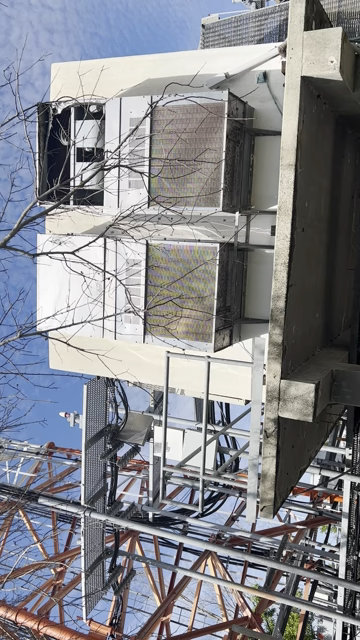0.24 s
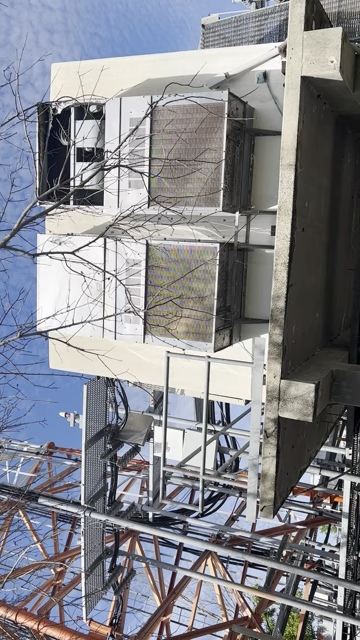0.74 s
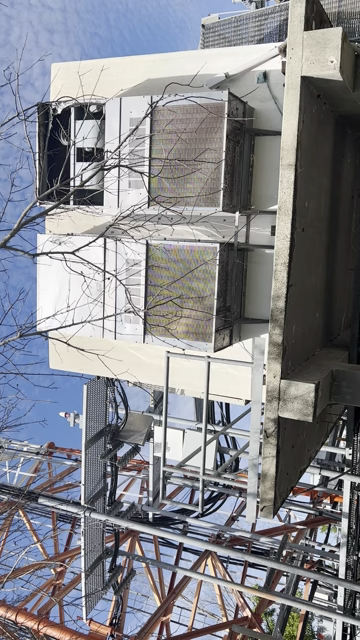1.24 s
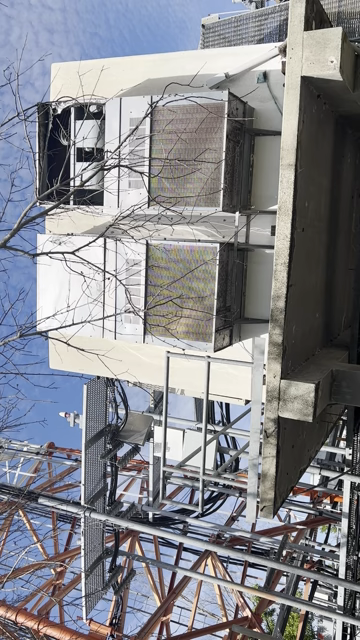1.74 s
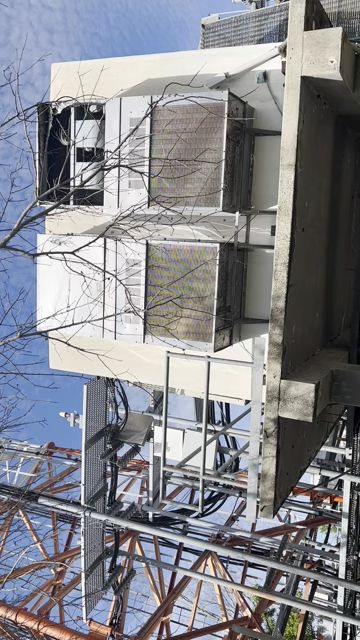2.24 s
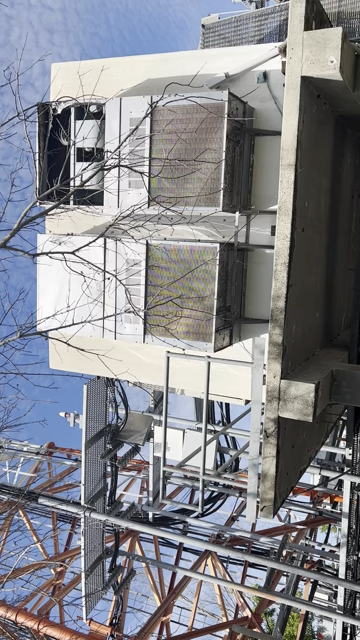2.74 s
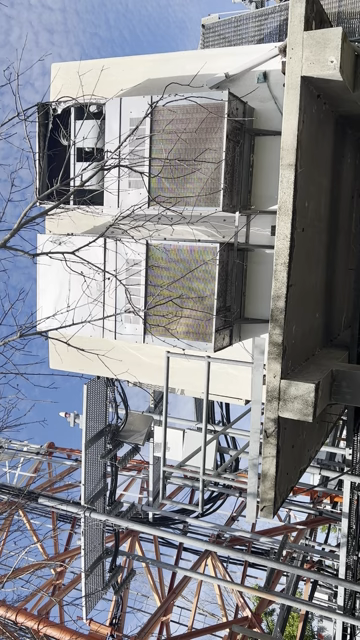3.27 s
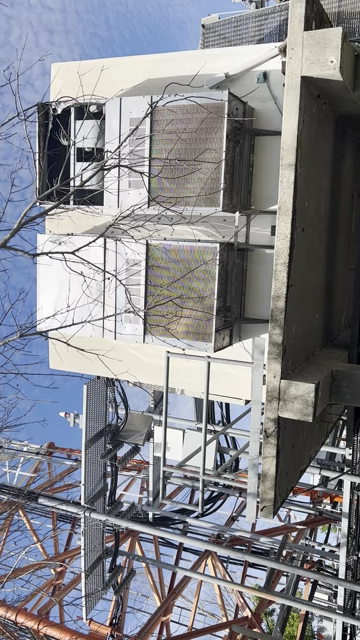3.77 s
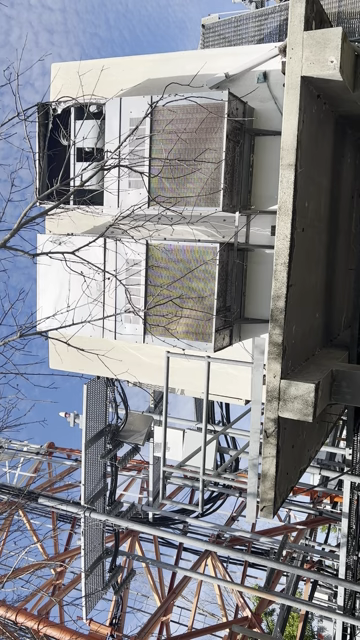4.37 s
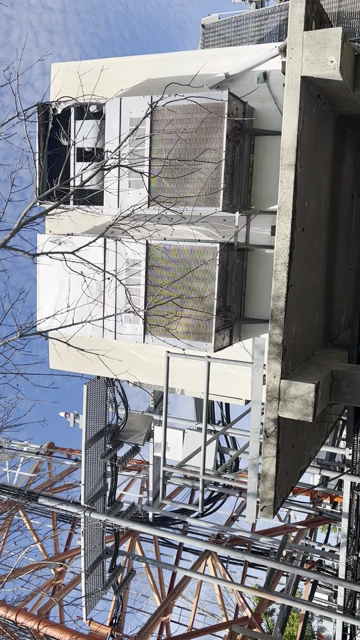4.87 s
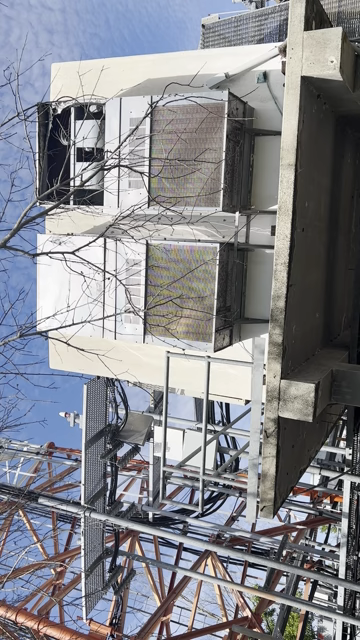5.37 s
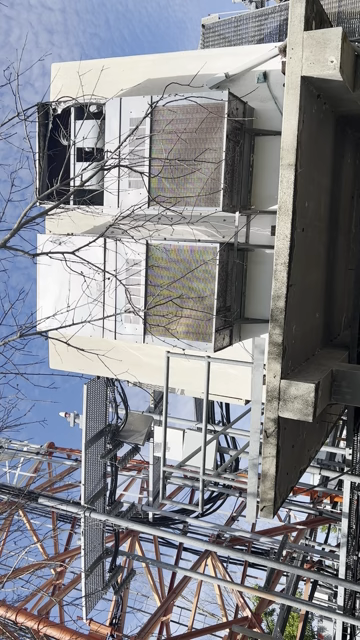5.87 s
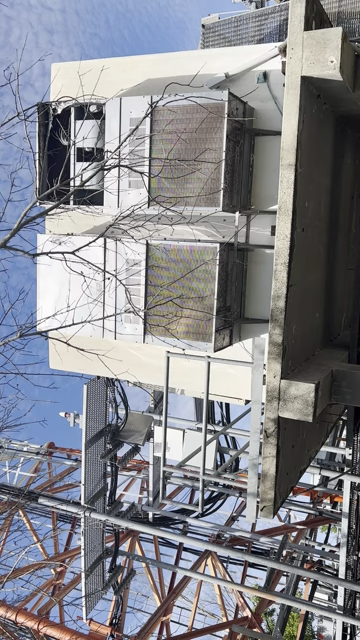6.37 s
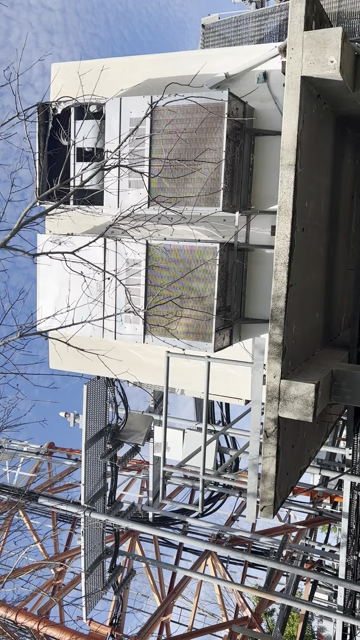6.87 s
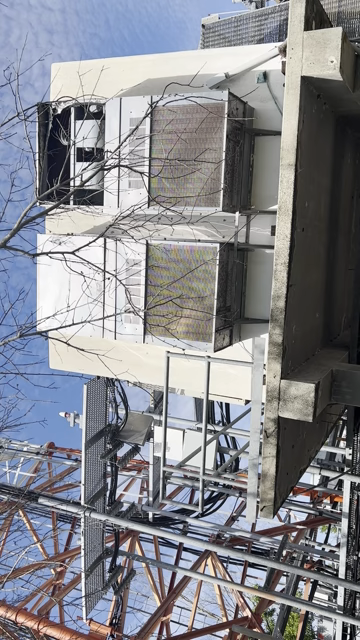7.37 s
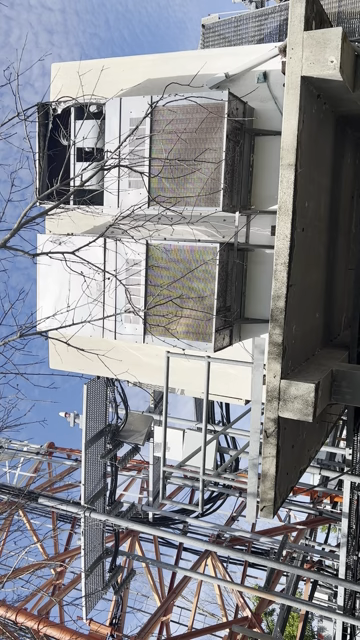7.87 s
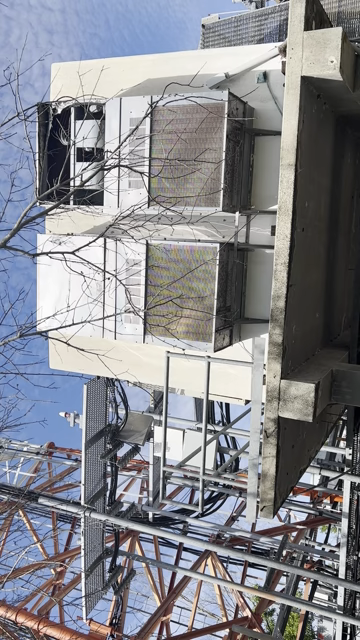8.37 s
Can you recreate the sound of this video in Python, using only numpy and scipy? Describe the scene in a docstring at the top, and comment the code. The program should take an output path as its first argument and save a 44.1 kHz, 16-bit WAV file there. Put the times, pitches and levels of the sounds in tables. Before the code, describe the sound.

Low, wavering fan drone and compressor hum from wall-mounted cooling units outdoors, with muffled airflow, tiny clicks, faint squeaks and a soft knock near the end.

```python
"""Two wall-mounted air conditioning units

Two units run on the wall of an equipment hut, heard outdoors from a few metres away.
One fan drones at its blade rate, a sine that swells and fades; the second fan and the compressors
add low lines, some of which beat. Air rushing through the coils is shaped noise; the panels whine
faintly as narrow resonances. Light ticks, dull knocks and a scuff are decaying bursts of noise; a tap
on metal is a few ringing modes; faint squeals and a thin high chirp are short tones with reflections."""
import sys
import numpy as np
from scipy import signal
from scipy.fft import rfft, irfft
from scipy.io import wavfile

SR = 44100
rng = np.random.default_rng(int(sys.argv[2]) if len(sys.argv) > 2 else 0)


def wav_out(sig):
    """Save sig, one row per channel (or a flat mono array), as 16-bit PCM at SR to the path in sys.argv[1]."""
    wavfile.write(sys.argv[1], SR, np.round(np.clip(np.atleast_2d(sig).T, -1, 1) * 32767).astype(np.int16))


N = 380141
TIME = np.arange(N) / SR   # s
BINS = np.fft.rfftfreq(N, 1 / SR)   # Hz

# Mean spectrum of the rushing air: f/Hz, density/dB per Hz
AIR_SPECTRUM = [(20, -92.5), (45, -71.5), (62, -61.5), (95, -62.5), (145, -63.5), (240, -71), (330, -75.5),
                (500, -77), (900, -84.5), (1600, -88.5), (2400, -97), (4700, -103), (7500, -111.3),
                (11800, -118.5), (15000, -118)]
# Likeness of the air noise at the two sides: f/Hz, likeness (0 to 1), phase lead of the left/rad
AIR_COHERENCE = [(60, .99, .05), (350, .88, .27), (700, .5, .35), (1000, .3, 0), (1250, .05, -1.6),
                 (1500, .45, -3.1), (1780, .9, -6.2), (2800, .77, -5.8), (4600, .7, -5.9),
                 (5500, .55, -6.9), (7300, .95, -6.3), (10000, .9, -9.4), (12400, .9, -12.4),
                 (13800, .95, -12.7), (15200, .8, -15.4)]
# Left-right balance of the air noise: f/Hz, level difference/dB
AIR_BALANCE = [(60, 1), (110, 3.5), (200, 1), (380, 1), (700, 3.5), (1290, 1), (2380, 2.5), (4400, 3),
               (8120, 0), (15000, 1)]
# Slow swells of the air noise: t/s, rumble level/dB, rush level/dB, hiss level/dB
AIR_SWELLS = [(0, 2, -0.6, 0), (.9, -1.5, -0.3, -0.1), (1.8, -3.5, -.7, -0.6), (2.2, -0.5, -.5, 0),
              (3.3, -2, -0.6, -0.5), (3.85, 3, 1.5, -0.2), (4.45, -2.5, -1.5, -0.5), (5.1, -2, -0.2, -0.3),
              (5.7, 2, 1, -0.5), (6.5, -1, 0.5, 0), (7.3, -1.5, 1.5, 0.5), (7.75, 1, 0, 0),
              (8.05, 3, 0.7, 0.9), (8.62, -0.5, 1, 0.7)]
# Unevenness of the air drawn into the units: t/s, level/dB
INFLOW = [(0, -0.5), (.9, -2), (1.7, -6), (2.7, -3.5), (3.3, -8), (3.9, 3), (4.55, -2), (5.1, .5),
          (6.2, 1.5), (7.0, 0.5), (8.62, 0.5)]
# Casing resonances stirred by the air, and motor whines:
# f/Hz, width/Hz, level/dB, left-right difference/dB, share of the inflow's swing
CASING_MODES = [(57.3, 7.6, -53.5, 0, 0), (205.1, 11.2, -54.5, 6.5, .8), (283, 16, -61, 2, .8),
                (389, 28, -60, 2.5, 0), (469.5, 18, -60, 1.5, .2), (553.7, 12, -63.5, 2, .3),
                (588.3, 14, -64.5, 1, 0.057), (638, 12, -65, 4, 0.26), (779, 9, -64.5, 2, 0.1),
                (871, 70, -65.5, 5, .1), (1022, 13, -69.5, 1.5, 0.39), (1127, 16, -75.5, 8.5, 0),
                (2740, 9.1, -83, -2.5, 0), (4470, 6.5, -86, -1.5, 0), (6440, 3.6, -100, 2.5, 0),
                (8550, 4.4, -99, -8, 0.014)]

# Light ticks: t/s, level/dB, centre f/Hz, t60/s
TICKS = [(.442, -57.5, 12000, .025), (.812, -55.5, 12000, 0.035), (.851, -66, 7500, 0.049),
         (1.178, -69, 8500, .2), (1.81, -69, 10500, 0.12), (2.27, -72, 12000, .17), (8.0, -75, 12500, .15)]
TICK_WIDTH_HZ, TICK_ATTACK_S = 15000, 0.0016
# Duller wash from the walls after each tick, its level relative to the tick
TICK_ECHO_DB, TICK_ECHO_HZ, TICK_ECHO_RISE_S, TICK_ECHO_T60_S = -11.5, 7000, 0.012, 0.22
# Small dull knocks, the last one leading into the scuff: t/s, level/dB, centre f/Hz, t60/s
KNOCKS = [(1.191, -42, 1030, .04), (8.436, -39, 680, .04)]
KNOCK_Q, KNOCK_ATTACK_S = 3.2, 0.003   # Q is centre over width
# A light tap on metal and its bounce: t/s, strength/dB
CLINKS = [(1.566, 2), (1.572, -2.5)]
# Metal modes that the tap sets ringing, at strength 0 dB: f/Hz, level/dB, t60/s
CLINK_MODES = [(2550, -62, .04), (3580, -61, .04), (4020, -66, .04), (4330, -65, .04)]
# Resonances of the scuffed body: centre f/Hz, width/Hz, level/dB, t60/s
SCUFF_BODY = [(533, 380, -48, .12), (1100, 600, -51.5, 0.14), (1750, 800, -52, .15),
              (2350, 270, -55.5, .17), (2750, 450, -58, .17), (4380, 2200, -65, 0.45),
              (6950, 2500, -72, 0.48)]
SCUFF_S, SCUFF_ATTACK_S, SCUFF_HOLD_S = 8.441, 0.013, 0.019
# Faint metallic squeals, levels before swell and mix:
# t/s, level/dB, f/Hz, length/s, waver as a share of f
SQUEALS = [(5.2, -71, 2643, .225, .004), (5.322, -66, 2185, .05, .006), (7.585, -66, 1620, .11, .01),
           (7.715, -70, 1580, .13, .01), (7.73, -71, 1820, .11, .012), (7.915, -64, 1570, 0.094, .007),
           (7.915, -68, 1835, .094, .008), (8.02, -67, 1590, .09, .01)]
SQUEAL_EDGE_S, SQUEAL_WAVER_PER_S = 0.019, 29.5
# Two quick pips of one thin chirp: t/s, level/dB
PIPS = [(5.781, -61), (5.792, -53.5)]
PIP_HZ, PIP_SAG_HZ_PER_S = 12920, 25000   # starting pitch and rate of fall
PIP_ATTACK_S, PIP_LENGTH_S = 0.003, 0.02

# Compressor and mains hum, and thin motor whines: f/Hz, level/dB
HUM = [(39.5, -57.5), (59.0, -51), (79.9, -53.5), (94.9, -63.5), (120.1, -45.5), (825, -78.5), (1179, -83)]
# Level of one compressor line, which beats with its neighbours: t/s, level/dB
THROB = [(0, -49), (0.9, -45.5), (1.9, -47.5), (2.6, -43), (3.7, -39.5), (4.15, -57), (8.62, -59.5)]
THROB_HZ = 61.5
# Blade tone of the second fan, before its overall gain: t/s, level/dB
SECOND_FAN = [(0.0, -46), (0.84, -58), (1.08, -41), (1.56, -58), (1.66, -41), (2.33, -43.5), (2.47, -63),
              (2.76, -38.5), (3.27, -53.5), (3.62, -39), (4.82, -52), (5.71, -38.5), (6.53, -50.5),
              (8.62, -47.5)]
# Other shaft orders of the second fan, levels at an inflow of 0 dB:
# multiple of the shaft rate, level/dB, share of the inflow's swing
SHAFT_ORDERS = [(4, -49.5, 0.074), (5, -52, 0.056), (6, -51.5, .5), (11, -58.5, 0), (12, -63, 0),
                (15, -57.5, 0.96), (17, -74, 0), (20, -69.5, 0.02)]
SHAFT_HZ, BLADE_ORDER = 14.13, 10   # mean turns per second; blade tone as a multiple of it
# Blade rate of the louder fan, which follows its speed: t/s, f/Hz
BLADE_RATE = [(0, 127.6), (0.85, 124.8), (2.4, 126.3), (4.1, 127.4), (4.9, 126), (5.5, 127), (6.2, 124.8),
              (6.7, 126.2), (8.62, 124.5)]
# Blade tone of the louder fan, swelling and fading: t/s, level/dB
DRONE = [(0.0, -37), (0.48, -37), (0.8, -43.5), (1.22, -35), (1.7, -60), (2.0, -37), (2.52, -32),
         (2.97, -41), (3.4, -39), (4.4, -36.5), (4.66, -42.5), (5.08, -32), (5.62, -30.5), (6.26, -37),
         (6.55, -32), (6.86, -36), (7.02, -51), (7.5, -42), (7.78, -45), (7.95, -36.5), (8.27, -33.5),
         (8.62, -53)]

CUTOFF_HZ = 15500


def from_db(db):
    """Amplitude ratio of a level in decibels."""
    return 10 ** (np.asarray(db) / 20)


def rms_one(x):
    """Scale to unit root mean square."""
    return x / np.sqrt(np.mean(np.abs(x) ** 2) + 1e-30)


def in_time(rows):
    """Linear interpolation of each column at every sample."""
    s, *columns = np.transpose(rows)
    return [np.interp(TIME, s, c) for c in columns]


def over_hz(rows):
    """Interpolation of each column at every frequency bin, on a logarithmic axis."""
    hz, *columns = np.transpose(rows)
    return [np.interp(np.log(BINS + 1), np.log(hz), c) for c in columns]


def drift(rate_hz):
    """Slow random wander of spread 1: noise through a double-pole low-pass."""
    step = 100   # samples between computed points
    warm_up = 1000   # points discarded while the filter settles
    pole = np.exp(-2 * np.pi * rate_hz * step / SR)
    noise = rng.standard_normal(N // step + 2 + warm_up)
    slow = signal.lfilter([1], [1, -2 * pole, pole * pole], noise)[warm_up:]
    return np.interp(np.arange(N) / step, np.arange(len(slow)), rms_one(slow))


def tone(hz):
    """A sine of unit rms whose phase is the integral of its frequency."""
    turns = np.cumsum(hz * np.ones(N)) / SR + rng.random()
    return np.sqrt(2) * np.sin(2 * np.pi * turns)


def resonate(x, hz, width):
    """A two-pole resonance: its bandwidth sets the pole radius."""
    r = np.exp(-np.pi * width / SR)
    return signal.lfilter([1, 0, -1], [1, -2 * r * np.cos(2 * np.pi * hz / SR), r * r], x)


def pan(db):
    """Left and right gains that share a level difference equally."""
    return from_db(np.array([[db], [-db]]) / 2)


def reflections(x, t60):
    """Diffuse reverberation: dense, dying echoes of unit energy from walls and steelwork."""
    age = TIME[:SR // 2]
    echoes = rng.standard_normal(len(age)) * from_db(-60 * age / t60)
    return signal.fftconvolve(x, echoes / np.linalg.norm(echoes))[:N]


def bursts(rows, hold=0, spread=0.8):
    """Friction and contact excite a resonance with noise that rises, holds and decays exponentially."""
    out = np.zeros((2, N))
    for s, level_db, hz, width, attack, t60 in rows:
        start = round(s * SR)
        age = TIME[:min(SR, N - start)]
        mid, side = rng.standard_normal((2, len(age)))
        noise = mid + spread * side * [[1], [-1]]
        ring = resonate(resonate(noise, hz, width), hz, width)
        rise = np.clip(age / attack, 0, 1)
        decay_db = -60 * np.maximum(age - attack - hold, 0) / t60
        out[:, start:start + len(age)] += rms_one(ring) * rise * from_db(level_db + decay_db)
    return out


def air(lumpy_db=2.5, lumps_hz=7, patchy_db=1.0, hiss_patchy_db=0.5):
    """Turbulence through the coils: partly coherent noise in three bands, each with its own swells."""
    likeness, lead = over_hz(AIR_COHERENCE)
    likeness = np.clip(likeness, 0, 1)
    shared, left, right = rfft(rng.standard_normal((3, N)))
    sides = np.array([[0.5], [-0.5]])
    common = np.sqrt(likeness) * shared * np.exp(1j * lead * sides)
    separate = np.sqrt(1 - likeness) * np.array([left, right])
    level_db = over_hz(AIR_SPECTRUM)[0] + over_hz(AIR_BALANCE)[0] * sides
    # sqrt(SR / 2) turns a density per Hz into the level of white noise
    noise = irfft((common + separate) * from_db(level_db) * np.sqrt(SR / 2), N)

    def lowpass(hz):
        """Zero-phase low-pass that splits the bands."""
        return signal.sosfiltfilt(signal.butter(2, hz, fs=SR, output="sos"), noise)

    below_rush, below_hiss = lowpass(160), lowpass(1350)
    bands = below_rush, below_hiss - below_rush, noise - below_hiss   # rumble, rush, hiss
    flicker = lumpy_db * drift(lumps_hz), patchy_db * drift(15), hiss_patchy_db * drift(17)
    swells = in_time(AIR_SWELLS)
    return sum(band * from_db(swell + fast) for band, swell, fast in zip(bands, swells, flicker))


def casing(spread_hz=1100, sway_db=1.0):
    """Forced resonance: turbulence feeds narrow modes, whose two sides differ more at high frequency."""
    out = 0
    mid, side = rng.standard_normal((2, N))
    inflow = in_time(INFLOW)[0]
    for hz, width, level_db, pan_db, share in CASING_MODES:
        stir = mid + min(hz / spread_hz, 0.7) * side * [[1], [-1]]
        # two wider resonances in series make one of about the listed width
        ring = resonate(resonate(stir, hz, 1.3 * width), hz, 1.3 * width)
        swell = from_db(share * inflow + sway_db * drift(0.95))
        out = out + from_db(level_db) * pan(pan_db) * rms_one(ring * swell)
    return out


def ticks():
    """Brief contacts radiate a broad, bright spectrum, with a duller wash from the walls behind."""
    direct, wash = [], []
    for s, db, hz, t60 in TICKS:
        direct.append((s, db, hz, TICK_WIDTH_HZ, TICK_ATTACK_S, t60))
        wash.append((s, db + TICK_ECHO_DB, TICK_ECHO_HZ, TICK_WIDTH_HZ, TICK_ECHO_RISE_S, TICK_ECHO_T60_S))
    return bursts(direct + wash)


def knocks():
    """A soft impact excites one damped resonance, its width set by centre frequency over Q."""
    return bursts([(s, db, hz, hz / KNOCK_Q, KNOCK_ATTACK_S, t60) for s, db, hz, t60 in KNOCKS])


def clink():
    """Modal impact: each touch sets a few metal modes ringing in exponential decay."""
    out = np.zeros(N)
    for s, strength_db in CLINKS:
        age = np.maximum(TIME - s, 0)
        for hz, db, t60 in CLINK_MODES:
            decay_db = -60 * np.minimum(age / t60, 2)   # levels off 120 dB down
            out += (age > 0) * from_db(strength_db + db + decay_db) * tone(hz)
    return out


def squeals(flutter_db=1.0, arch_db=4.0, rough=0.3, rough_hz=90, direct_db=-3.5, echo_db=-6.0, t60=0.3):
    """Modulated tones: amplitude arches and roughens, pitch wavers, and reflections blur the whole."""
    out = np.zeros(N)
    for s, level_db, hz, length, waver in SQUEALS:
        inside = np.maximum(np.minimum(TIME - s, s + length - TIME), 0)   # s to the nearer end
        edges = np.minimum(inside / SQUEAL_EDGE_S, 1)
        envelope = edges * from_db(level_db + arch_db * 2 * inside / length)
        pitch = hz * (1 + waver * drift(SQUEAL_WAVER_PER_S))
        flutter = from_db(flutter_db * drift(SQUEAL_WAVER_PER_S))
        out += envelope * flutter * (1 + rough * drift(rough_hz)) * tone(pitch)
    echoes = np.array([reflections(out, t60), reflections(out, t60)])
    return from_db(direct_db) * out + from_db(echo_db) * echoes


def chirp(t60=0.3):
    """Linear frequency sweeps: short falling sines near the top of hearing, smeared by reflections."""
    call = np.zeros(N)
    for s, level_db in PIPS:
        since = np.clip(TIME - s, 0, PIP_LENGTH_S)
        envelope = np.interp(since, [0, PIP_ATTACK_S, PIP_LENGTH_S], [0, 1, 0]) ** 2
        call += from_db(level_db) * envelope * tone(PIP_HZ - PIP_SAG_HZ_PER_S * since)
    return call + reflections(call, t60)


def scuff(grit_db=1.5, grit_hz=130):
    """Sliding friction: a short, slightly gritty rub excites all resonances of a body together."""
    rows = [(SCUFF_S, db, hz, width, SCUFF_ATTACK_S, t60) for hz, width, db, t60 in SCUFF_BODY]
    return from_db(grit_db * drift(grit_hz)) * bursts(rows, hold=SCUFF_HOLD_S)


def compressors(sway_db=2.0):
    """Beating: nearly steady lines, of which the close pair near 60 Hz throbs until one fades."""
    steady = sum(from_db(level_db + sway_db * drift(0.74)) * tone(hz) for hz, level_db in HUM)
    return steady + from_db(in_time(THROB)[0]) * tone(THROB_HZ)


def second_fan(blade_gain_db=-2.0, speed_wander=0.002, sway_db=1.9):
    """Shaft harmonics: all lines follow one wandering speed; uneven inflow sways some weaker orders."""
    shaft = SHAFT_HZ * (1 + speed_wander * drift(0.9))
    out = from_db(in_time(SECOND_FAN)[0] + blade_gain_db) * tone(BLADE_ORDER * shaft)
    inflow = in_time(INFLOW)[0]
    for order, level_db, share in SHAFT_ORDERS:
        sway = share * inflow + sway_db * drift(1.5)
        out += from_db(level_db + sway) * tone(order * shaft)
    return out


def louder_fan(flutter_db=0.5, jitter_hz=0.32):
    """Blade-passing tone: a sine at the blade rate, with slight flutter of level and pitch."""
    pitch = in_time(BLADE_RATE)[0] + jitter_hz * drift(9.7)
    level_db = in_time(DRONE)[0] + flutter_db * drift(17)
    return from_db(level_db) * tone(pitch)


def scene():
    """Superposition: the low lines reach both sides alike, a little louder on the left."""
    background = air() + casing()
    incidents = ticks() + knocks() + clink() + squeals() + chirp() + scuff()
    low_lines = compressors() + second_fan() + louder_fan()
    return background + incidents + low_lines * pan(0.8)   # dB left over right


def record(dry):
    """Elliptic low-pass filtering cuts the top steeply."""
    return signal.sosfilt(signal.ellip(10, 0.1, 80, CUTOFF_HZ, fs=SR, output="sos"), dry)


dry = scene()
out = record(dry)
wav_out(out)
```